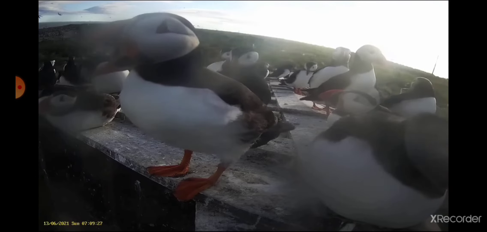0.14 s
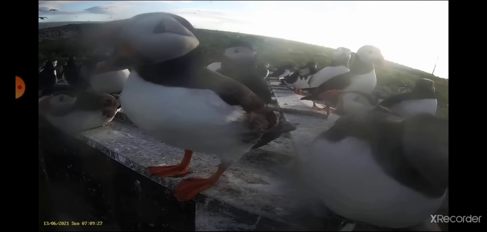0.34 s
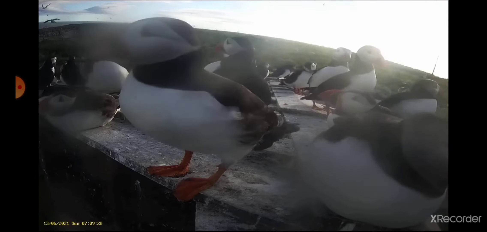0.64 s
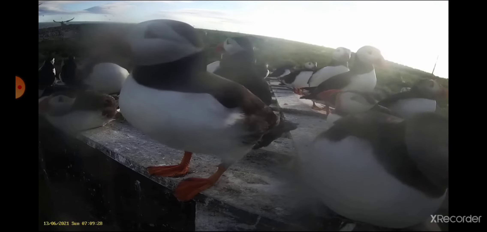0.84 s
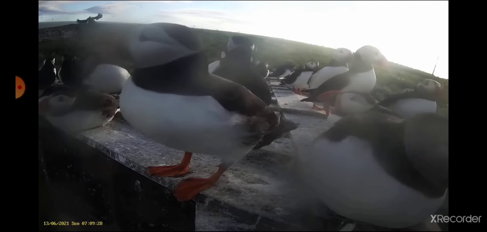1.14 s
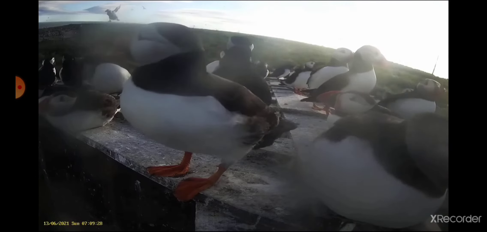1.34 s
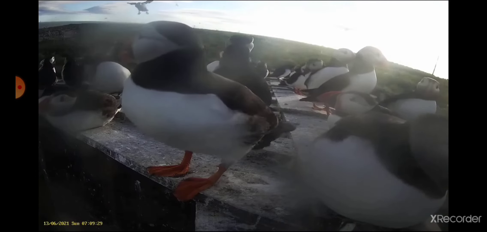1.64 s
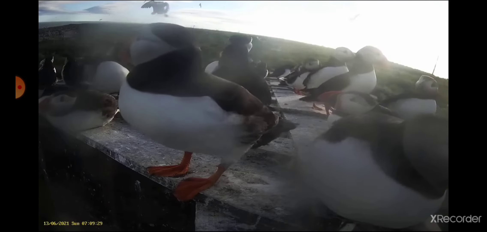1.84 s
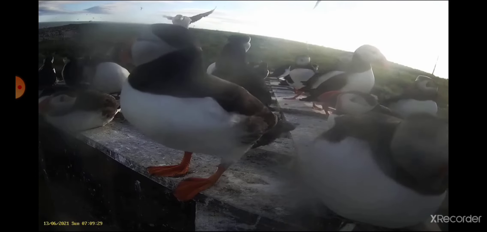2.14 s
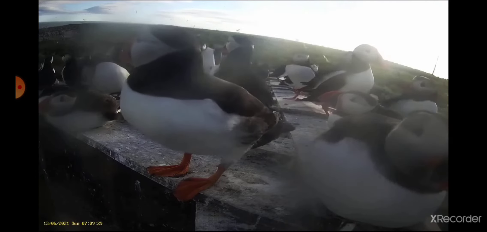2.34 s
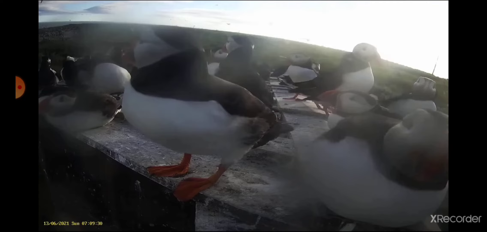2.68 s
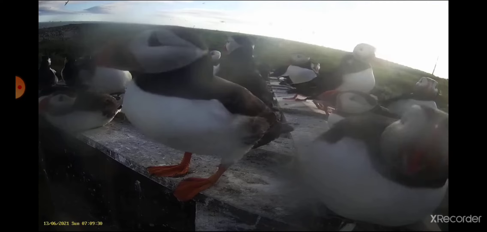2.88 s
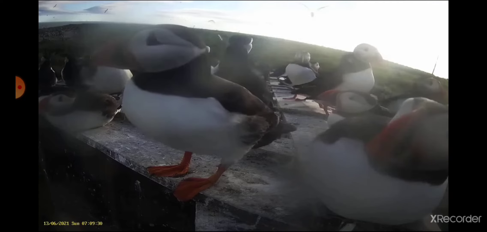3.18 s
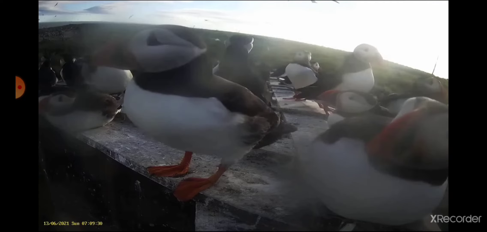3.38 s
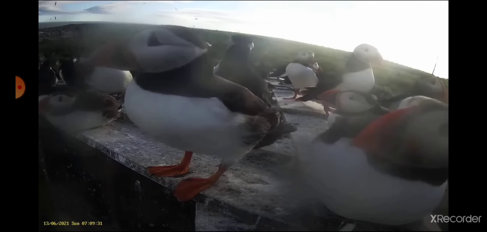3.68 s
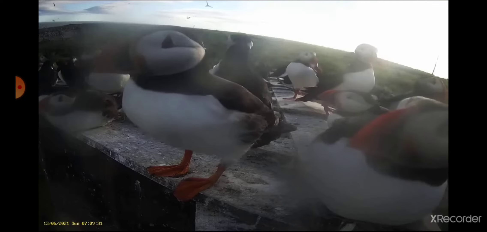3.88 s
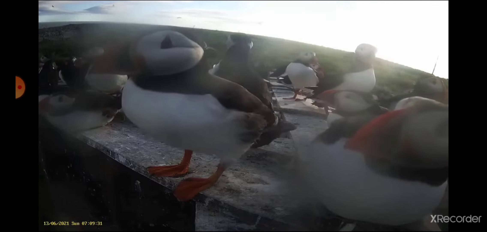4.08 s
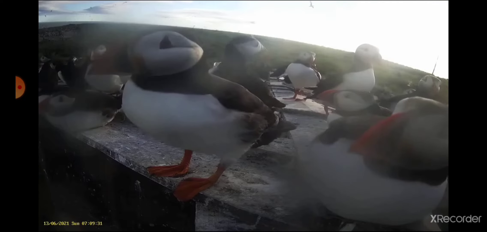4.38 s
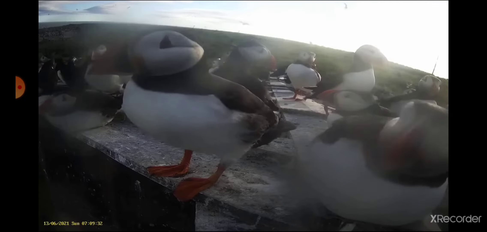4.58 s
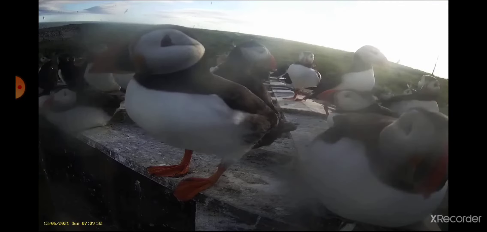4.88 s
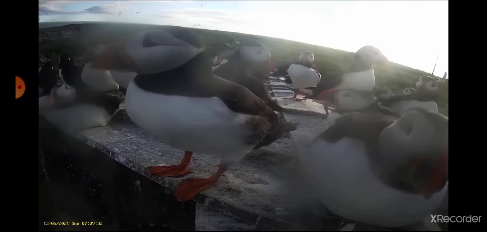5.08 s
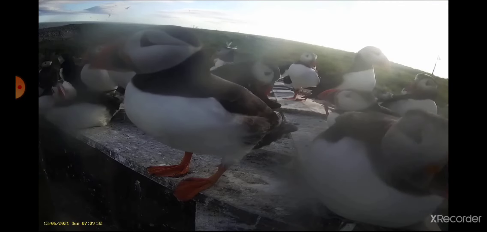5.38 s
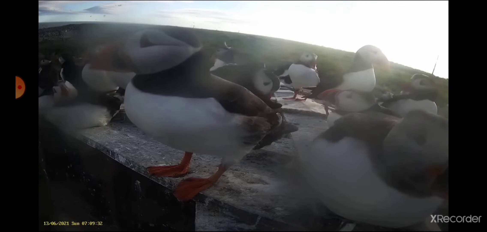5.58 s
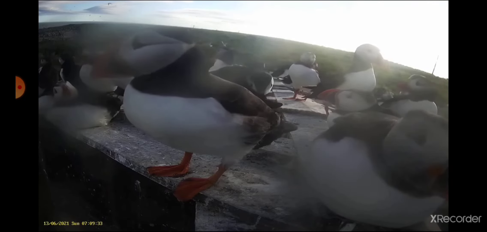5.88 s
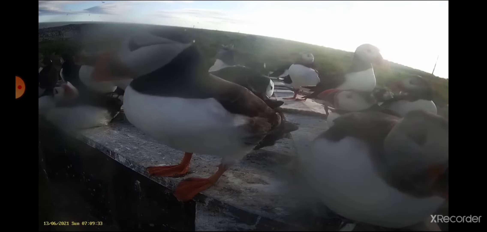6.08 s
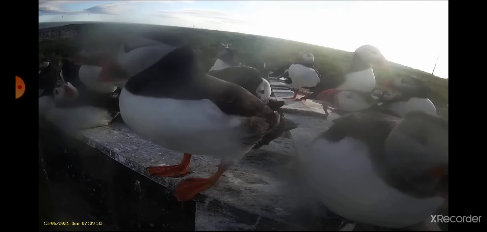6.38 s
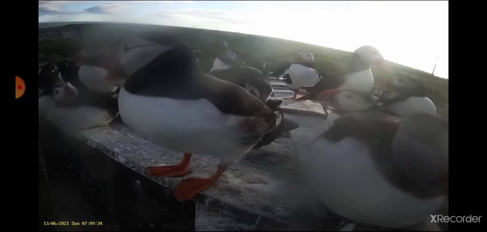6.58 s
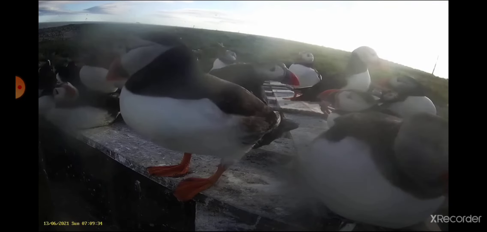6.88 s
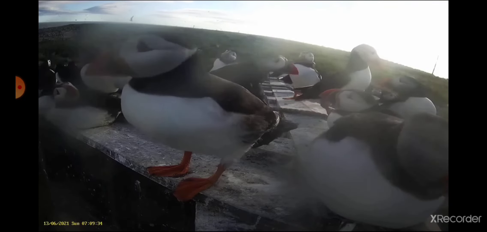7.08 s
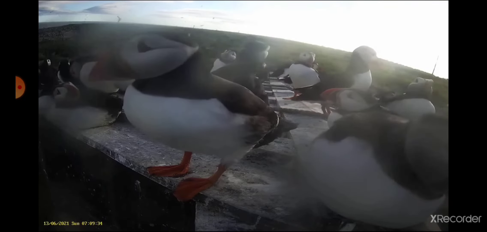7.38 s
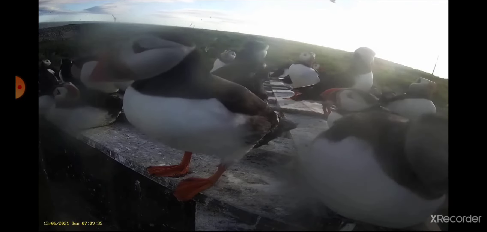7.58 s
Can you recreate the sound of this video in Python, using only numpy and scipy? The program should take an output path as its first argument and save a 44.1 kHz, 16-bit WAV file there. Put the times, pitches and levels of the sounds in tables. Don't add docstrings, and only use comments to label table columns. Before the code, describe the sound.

A dense seabird colony chatters shrilly while nearby birds rasp, shriek and stutter, loudest near the end, over wind rumble and webbed footsteps on rock.

```python
import sys
import numpy as np
from scipy import signal
from scipy.io import wavfile
from scipy.ndimage import uniform_filter1d

SR = 44100
rng = np.random.default_rng(int(sys.argv[2]) if len(sys.argv) > 2 else 0)


def level_to_linear(level):
    exponent = np.asarray(level, float) / 20
    return 10 ** exponent


def generate_wav(signal):
    frames = np.transpose(np.atleast_2d(signal))
    scaled = np.clip(frames, -1, 1) * 32767
    pcm = np.round(scaled).astype(np.int16)
    wavfile.write(sys.argv[1], SR, pcm)


N = 340893

# f/Hz, level/dB
BUZZ = [(500, -65), (600, -62), (700, -65.5), (800, -76)]
# f/Hz, density/dB per Hz
WIND_SPECTRUM = [(12, -36), (20, -7), (125, 3), (222, -1), (339, 3), (528, -7.5), (835, -15), (1000, -24),
                 (1300, -42), (2200, -120)]
# t at peak/s, peak level/dB
GUSTS = [(.2, -39), (.49, -50), (1.94, -58.5), (2.301, -52), (2.38, -50.5), (2.5, -54), (3.1, -43.5),
         (3.45, -46.5), (4.42, -50), (4.76, -48), (6.76, -50), (2.66, -52), (5.06, -41.5), (5.5, -50),
         (5.999, -47.5), (7.2, -46.5)]
# t/s, peak level/dB, ring f/Hz
STEPS = [
    (0.497, -32, 348),
    (1.949, -30.5, 315),
    (2.244, -22, 462),
    (2.271, -26.5, 333),
    (2.412, -28.5, 374),
    (2.475, -27, 945),
    (3.131, -22, 353),
    (6.511, -34.5, 1030),
    (7.431, -32.5, 402),
]
# t/s, crowd level/dB, shrillness/dB
COLONY = [(0.0, -39, -11), (0.3, -39, -12.5), (0.49, -37.5, -14.5), (0.6, -35, -10), (1.29, -38, -12.5),
          (2.58, -35, -11), (3.47, -38.5, -15.5), (3.55, -38, -5), (3.87, -36, -11), (4.41, -34, -16.5),
          (6.29, -38.5, -8), (6.31, -36.5, -0.5), (6.5, -34.5, -6), (7.02, -36.5, -9.5), (7.11, -34, -2),
          (7.3, -33.5, -17.5), (7.6, -35, -11.5), (7.73, -37, -6.5)]
# f/Hz, density/dB per Hz
CROWD_SPECTRUM = [(410, -37.5), (700, -11), (859, -12.5), (1870, 0.5), (2230, 1.5), (3050, 6.5),
                  (3360, 3.5), (4050, -8.5), (6160, -11), (7200, -26), (9360, -61.5), (15800, -120)]
# start t/s, end t/s, start f/Hz, end f/Hz, level/dB
WISPS = [(.605, .65, 5100, 4900, -42), (.66, .79, 4850, 4900, -45), (1.13, 1.2, 6190, 6700, -55.5),
         (1.751, 1.86, 5000, 5050, -51.5), (2.141, 2.23, 6500, 6250, -54), (2.502, 2.62, 4050, 3950, -52),
         (2.891, 3.05, 5250, 5710, -49.5), (3.455, 3.515, 5250, 5050, -53), (3.784, 3.92, 5900, 5750, -51),
         (4.058, 4.13, 5120, 5430, -54), (4.705, 4.8, 4800, 4550, -47), (4.779, 4.9, 6050, 5700, -54.5),
         (5.222, 5.36, 5400, 5600, -50), (5.42, 5.485, 5300, 5700, -48), (6.442, 6.52, 5000, 5060, -45),
         (7.076, 7.13, 4970, 5240, -44), (2.05, 2.11, 2300, 2500, -44), (3.543, 3.66, 1620, 1380, -48),
         (4.091, 4.45, 1700, 1780, -45), (5.63, 5.79, 3330, 3300, -40), (5.45, 5.53, 2350, 2650, -44),
         (6.548, 6.718, 5350, 5150, -44), (.6, .645, 3850, 3750, -41), (6.672, 6.71, 3950, 3900, -40),
         (.79, .84, 4600, 4700, -44), (.945, .968, 5500, 5800, -46), (.172, .2, 5150, 5000, -52),
         (5.118, 5.15, 5600, 5400, -50), (5.04, 5.11, 4850, 4900, -50), (4.46, 4.56, 5450, 5200, -49),
         (7.7, 7.72, 1700, 1720, -37), (2.47, 2.66, 1600, 1500, -45), (3.76, 3.81, 5750, 6050, -54)]
# t/s, peak level/dB, third harmonic f/Hz
KIPS = [
    (0.9339, -37.5, 5750),
    (1.2322, -36.5, 5860),
    (1.6598, -35, 5690),
    (2.0445, -30.5, 5750),
    (2.378, -41, 5500),
    (2.8527, -38.5, 5500),
    (3.3547, -31.5, 5460),
    (3.6769, -23, 5650),
]
# first t/s, length/s, f/Hz, rate/knocks per s, peak level/dB
RATTLES = [
    (7.133, .068, 2750, 94, -20),
    (7.085, .004, 3300, 94, -20),
    (7.238, .012, 2700, 100, -23),
]

# centre t/s, length/s, second harmonic f/Hz, peak level/dB
STUTTER = [(.363, .012, 3166, -28.5), (0.452, .016, 3100, -30.5), (5.848, .008, 3210, -28),
           (5.861, .014, 3200, -27.5), (5.879, .014, 3200, -19), (5.888, .008, 2956, -17.5),
           (5.896, .012, 2666, -22.5), (5.905, .01, 3050, -26), (5.945, .016, 3052, -17),
           (5.958, .014, 3040, -17), (5.966, .008, 2900, -22.5), (5.971, .014, 2620, -24),
           (5.989, .018, 3176, -27.5), (6.012, .024, 3145, -28), (6.028, .018, 3020, -29.5),
           (6.053, .02, 2187, -35), (6.304, .009, 2870, -26.5), (6.315, .012, 2960, -26),
           (6.386, .022, 2787, -26), (6.396, .009, 2700, -24.5), (6.55, .02, 2840, -29.5),
           (6.57, .014, 2750, -27), (6.586, .026, 2716, -29), (6.606, .01, 2740, -33.5),
           (6.617, .01, 2700, -28.5), (6.627, .01, 2700, -30.5), (6.64, .008, 2700, -33),
           (6.649, .01, 2720, -32.5), (6.658, .012, 2720, -33), (6.67, .01, 2730, -33),
           (6.683, .009, 2705, -30), (6.69, .01, 2660, -33.5), (6.703, .009, 2640, -29.5),
           (6.749, .018, 3180, -17), (6.76, .008, 2950, -21), (6.768, .011, 2720, -13),
           (6.778, .007, 2520, -20), (6.822, .027, 3020, -17), (6.844, .016, 2720, -16),
           (6.854, .01, 2550, -23), (7.327, .014, 2710, -32.5), (7.41, .01, 2690, -24),
           (7.434, .012, 2310, -30.5), (7.449, .012, 2325, -30), (7.482, .01, 2594, -28.5),
           (7.71, .005, 3490, -27.5), (7.714, .005, 3520, -25.5), (7.73, .008, 3576, -17.5)]
CHATTER = [(.611, .012, 2530, -30), (.62, .012, 2550, -30.5), (.641, .016, 2430, -29.5),
           (.661, .012, 2290, -32), (.697, .012, 2550, -33), (.714, .01, 2534, -28),
           (.737, .014, 2506, -29), (.753, .014, 2540, -31.5), (.774, .014, 2465, -29),
           (.79, .01, 2380, -29), (.809, 0.015, 2330, -28), (1.27, .02, 2040, -35.5),
           (1.281, .024, 3300, -38), (2.47, .02, 1946, -33), (2.47, .012, 2960, -33.5),
           (4.29, 0.017, 3330, -31), (4.315, .02, 3305, -31.5), (4.465, .016, 2940, -29.5),
           (4.482, .014, 2783, -31), (4.565, .02, 2610, -30.5), (4.749, .014, 2650, -27.5),
           (4.77, .022, 2656, -28.5), (4.792, .022, 2676, -27.5), (4.815, .016, 2890, -32),
           (4.857, .016, 2830, -31), (4.874, .014, 2700, -29.5), (4.893, .016, 2666, -31),
           (4.916, .014, 2676, -27.5), (4.936, .014, 2700, -29.5), (4.957, .014, 3090, -31.5),
           (5.168, .014, 2673, -30), (5.523, .014, 3000, -33), (5.66, .014, 2984, -33)]
TRILLS = [(3.53, .013, 3420, -41), (3.544, .013, 3510, -43), (3.561, .013, 3570, -42),
          (3.577, .013, 3680, -38), (3.591, .013, 3670, -39), (3.605, .013, 3590, -39),
          (3.618, .013, 3530, -43.5), (5.539, .011, 2760, -45), (5.551, .011, 2870, -38.5),
          (5.563, .011, 2940, -39), (5.574, .011, 2880, -39), (5.586, .011, 2770, -40)]
# rasp/0-1, third harmonic level/dB, fourth level/dB, pitch sag/per s
SYLLABLE_VOICES = [
    (.04, -22, -20, 2.5),
    (.35, -17, -17, 4.5),
    (.1, -0.5, -6.5, .6),
]

# t/s, length/s, second harmonic start f/Hz, end f/Hz, peak level/dB
NOTES = [(4.134, .012, 3750, 3650, -22), (5.908, .032, 3090, 3050, -29), (6.721, .013, 3150, 3140, -21),
         (7.096, .005, 3250, 3250, -19), (7.108, .006, 2980, 3000, -21), (7.117, .025, 3090, 3030, -21),
         (7.37, .01, 2960, 2950, -22), (7.386, .042, 3040, 2400, -24), (7.446, .053, 2910, 2450, -28)]
SHRIEKS = [(.24, .04, 3270, 3180, -32), (.278, .085, 3180, 3160, -32), (5.84, .034, 3190, 3200, -32),
           (6.422, .028, 2730, 2570, -32), (6.487, .024, 3870, 3860, -34), (6.516, .018, 3880, 3870, -30),
           (7.21, .034, 3270, 3240, -24)]
SCREAMS = [(.365, 0.077, 3130, 3070, -32.5), (.462, .04, 3100, 2696, -30), (0.955, 0.11, 2256, 2020, -39.5),
           (1.802, 0.073, 3270, 3070, -36.5), (2.141, 0.15, 3297, 2890, -40.5),
           (3.05, 0.17, 3223, 2444, -33.5), (4.41, 0.19, 3196, 2514, -31.5),
           (5.121, 0.058, 2610, 2414, -34.5)]
LEVEL_CALLS = [(.031, .06, 2110, 2015, -46), (.8, 0.052, 2264, 2416, -35.5), (1.33, .06, 2050, 2260, -45.5),
               (1.432, 0.098, 1630, 1826, -50), (1.476, 0.11, 3590, 3660, -42.5),
               (2.352, .055, 2004, 1980, -38), (2.484, .088, 3293, 3150, -34.5),
               (2.575, .12, 3146, 3060, -39), (2.74, 0.2, 2090, 2065, -45), (3.325, .035, 1916, 1957, -39),
               (3.385, .06, 1983, 2014, -41), (3.8, 0.11, 2926, 3066, -42), (4.02, 0.16, 3500, 3560, -40.5),
               (4.295, .055, 2060, 2200, -40.5), (4.245, .165, 3374, 3243, -37.5),
               (4.885, .05, 2005, 2130, -33), (5.685, .05, 2400, 2470, -37), (6.462, .048, 2407, 2385, -30.5),
               (7.101, 0.01, 2025, 2020, -31.5), (7.67, .045, 2990, 3440, -34)]
SCOLDS = [(.605, 0.057, 2600, 2170, -38), (.691, 0.15, 2490, 2323, -35), (1.4, .045, 2080, 1900, -35),
          (1.509, .129, 2946, 2640, -39), (1.889, 0.09, 1777, 2127, -39.5), (2.47, .129, 2730, 2594, -38.5),
          (2.86, .19, 3404, 3230, -38), (3.52, 0.11, 3200, 3610, -40.5), (5.161, 0.18, 2727, 2660, -38.5),
          (4.8, .17, 2900, 2800, -38), (6.6, .11, 2750, 2650, -40), (1.52, .12, 2350, 2200, -38),
          (1.25, .07, 2150, 2100, -41), (5.9, .045, 2450, 2300, -33), (5.2, 0.14, 2750, 2550, -38),
          (6.779, 0.035, 2290, 2323, -36), (7.195, .055, 2667, 2570, -31), (7.135, .06, 2650, 2600, -33),
          (.6, .26, 3500, 3300, -41), (.66, .04, 2900, 2800, -38), (6.857, 0.022, 2470, 2900, -41)]
ARCHES = [
    (6.31, .052, 2800, 3090, -20),
]
WHISTLES = [
    (3.375, .09, 3600, 3970, -43),
]
SLIDES = [(3.455, .07, 3500, 3380, -40), (5.04, .065, 3330, 3340, -39), (5.105, .04, 3340, 3050, -37),
          (2.05, .104, 3470, 2596, -34), (4.671, .039, 3185, 2460, -30), (1.091, .1, 2150, 2430, -37),
          (3.741, .059, 3390, 2920, -40)]

# third harmonic level/dB, fourth level/dB, peak/share of length, drop at start/dB, drop at end/dB
CRY_VOICES = [
    (-24, -28, 0.73, 1.5, 5),
    (-18, -15.5, 0.51, 1.5, 3.5),
    (-14, -20.5, 0.84, 2.5, 3.5),
    (-10.5, -21.5, 0.17, -2, -1),
    (-8.5, -21, 0.21, -1.5, 1.5),
    (-13, -21, 0.65, 12.5, 17),
    (-6, -6.5, .5, 12, 11.5),
    (-23, -20, 0.31, 3, 1.5),
]
CRY_RASPS = [.15, .12, .55, .4, .8, .1, .1, .15]
# longest glide/s, glide end/share of length, return/share of the way, catch in the voice/dB
CRY_TUNES = [(.022, .98, 0, 11), (.022, .98, 0, 6), (1, .75, 0, 0), (1, .95, 0, 0), (1, .95, 0, 0),
             (1, .5, 1, 0), (1, .5, 1, 0), (1, .98, 0, 0)]


def rms_one(x):
    return x / np.sqrt(np.mean(np.abs(x) ** 2) + 1e-20)


def drift(size, hz):
    r = np.exp(-2 * np.pi * hz / SR)
    chance = np.random.default_rng(rng.integers(2 ** 31))
    noise = chance.standard_normal(size + 600)
    return rms_one(signal.lfilter([1], [1, -2 * r, r * r], noise)[600:])


def in_time(rows):
    s, *columns = np.transpose(rows)
    return [np.interp(np.arange(N) / SR, s, c) for c in columns]


def add(out, start_s, sound):
    at = max(round(start_s * SR), 0)
    out[at:at + len(sound)] += sound[:N - at]


def bands(spectrum, patchy_db, lift_db=0, lift_hz=4300):
    hz, db = np.transpose(spectrum)
    edges = np.geomspace(hz[0], hz[-1], int(3 * np.log2(hz[-1] / hz[0])) + 2)
    for low, high in zip(edges, edges[1:]):
        level_db = np.interp(np.log(low * high) / 2, np.log(hz), db)
        level_db = level_db + patchy_db * drift(N, 8.6) + lift_db * (low > lift_hz)
        yield signal.butter(2, [low, high], "band", fs=SR, output="sos"), level_to_linear(level_db)


def voice(hz, rasp, overtones_db, blur_hz=350, first_db=-22, breath_db=-18):
    size, rasp = len(hz), np.clip(rasp, 0, 1)
    wobble = 1 + .018 * rasp * drift(size, 30)
    phase = np.pi * np.cumsum(hz * wobble) / SR
    first_db = first_db + 8 * (hz.mean() < 2400)
    rate, start = rng.random(2)
    beat_hz = (70 + 35 * rate) * (1 + .18 * drift(size, 25))
    beat = 2 * np.pi * (np.cumsum(beat_hz) / SR + start)
    pulses = rms_one((1.1 + np.sin(beat)) ** (1.8 * rasp ** 2.2))
    shake = .6 * rasp
    third_db, fourth_db = overtones_db
    levels_db = [first_db, 0, third_db, fourth_db, fourth_db - 13]
    out = level_to_linear(breath_db) * drift(size, 1100) * np.cos(2 * phase)
    for order, db in enumerate(levels_db, start=1):
        width_hz = (40 + blur_hz * rasp) * (order + 1) / 3
        smear = (drift(size, width_hz) + 1j * drift(size, width_hz)) / np.sqrt(2)
        line = (np.sqrt(1 - shake) + np.sqrt(shake) * smear) * np.exp(1j * order * phase)
        out = out + level_to_linear(db) * np.real(line)
    return np.sqrt(2) * out * pulses


def buzz():
    t = np.arange(N) / SR
    return sum(np.sqrt(2) * level_to_linear(db) * np.sin(2 * np.pi * hz * t) for hz, db in BUZZ)


def gusts(breeze_db=-49, rise_s=0.081, fall_s=0.096):
    t = np.arange(N) / SR
    strength = level_to_linear(breeze_db)
    for s, db in GUSTS:
        strength = strength + level_to_linear(db) * np.exp(np.minimum((t - s) / rise_s, (s - t) / fall_s))
    return strength


def wind():
    white = rng.standard_normal((2, N))
    out = 0
    for k, (sos, gain) in enumerate(bands(WIND_SPECTRUM, 1.8)):
        out = out + gain * signal.sosfilt(sos, white[k % 2])
    return rms_one(out)


def steps(t60=0.092, scuff_db=-1.5):
    out, t = np.zeros(N), np.arange(4000) / SR
    for s, db, hz in STEPS:
        ring = np.sin(2 * np.pi * hz * t)
        scuff = level_to_linear(scuff_db) * drift(len(t), 970)
        decay = level_to_linear(db - 3.0 - 60 * t / t60) * np.minimum(t / 0.006, 1)
        add(out, s, decay * (ring + scuff))
    return out


def crowd(shrill_db, count=600, hiss_db=0):
    far = np.zeros(N)
    for s, length, pitch, sag, rasp, size in rng.random((count, 6)):
        u = np.linspace(0, 1, int((.05 + .2 * length ** 2) * SR))
        hz = (1800 + 1900 * pitch) * (1 + .06 * np.sin(np.pi * u) - .2 * sag * u ** 2)
        swell = level_to_linear(3.0 * size) * np.sin(np.pi * u) ** 0.3
        add(far, s * N / SR, swell * voice(hz, .38 + .45 * rasp, (-3, -4), first_db=-9))
    far = far / np.sqrt(uniform_filter1d(far ** 2, size=6000) + 1e-9)
    far = far + level_to_linear(hiss_db) * rng.standard_normal(N)
    white, out = rng.standard_normal(N), 0
    for k, (sos, gain) in enumerate(bands(CROWD_SPECTRUM, 2.1, shrill_db - shrill_db.mean())):
        size = signal.sosfilt(sos, white).std() * (-1) ** k
        part = signal.sosfilt(sos, far)
        loudness = np.sqrt(uniform_filter1d(part ** 2, size=6500) + 1e-12)
        out = out + size * gain * part / loudness
    return rms_one(out)


def wisps(arch=.03, rasp=.5):
    out = np.zeros(N)
    for start, end, from_hz, to_hz, db in WISPS:
        u = np.linspace(0, 1, int((end - start) * SR))
        hz = (from_hz + (to_hz - from_hz) * u) * (1 + arch * np.sin(np.pi * u))
        swell = level_to_linear(db) * np.sin(np.pi * u) ** 0.054
        add(out, start, swell * voice(hz, rasp, (-40, -40), first_db=-36.5))
    return out


def kips(length_s=0.014, fall=0.11, snap_db=-12):
    out, u = np.zeros(N), np.linspace(0, 1, int(length_s * SR))
    shape = np.minimum(u / 0.025, 1) * (1 - u) ** 0.24
    for s, db, hz in KIPS:
        snap = level_to_linear(snap_db) * drift(len(u), 11000)
        tone = voice(hz / 1.5 * (1.05 - fall * u), 0.13, (1.5, -14))
        add(out, s, level_to_linear(db - 7.0) * shape * (snap + tone))
    return out


def rattles(loss_db=70, knock_s=.0009):
    out, t = np.zeros(N), np.linspace(-4, 4, int(8 * knock_s * SR))
    for s, length, hz, rate, db in RATTLES:
        for late in np.arange(0, length, 1 / rate):
            tone = voice(hz + 0 * t, .15, (-16, -17), first_db=-19, breath_db=-7)
            knock = np.exp(-t ** 2 / 2) * tone
            add(out, s + late - 4 * knock_s, level_to_linear(db - 3 - loss_db * late) * knock)
    return out


def syllables():
    out = np.zeros(N)
    for rows, throat in zip([STUTTER, CHATTER, TRILLS], SYLLABLE_VOICES):
        rasp, third_db, fourth_db, sag = throat
        for s, length, hz, db in rows:
            t = np.arange(-length / 2, length / 2, 1 / SR)
            swell = np.cos(np.pi * t / length) ** 0.97 * level_to_linear(-1.5 - 5 * rasp)
            tone = voice(hz * (1 - sag * t), rasp, (third_db, fourth_db))
            add(out, s - length / 2, level_to_linear(db) * swell * tone)
    return out


def ground(x, echoes=((.004, -12), (.017, -16), (.041, -24))):
    out = x.copy()
    for s, db in echoes:
        add(out, s, level_to_linear(db) * x)
    return out


def cries(fade_s=.0025, scoop=.04, scoop_s=.006, catch_s=.0025):
    out = np.zeros(N)
    kinds = [NOTES, SHRIEKS, SCREAMS, LEVEL_CALLS, SCOLDS, ARCHES, WHISTLES, SLIDES]
    for rows, rasp, throat, tune in zip(kinds, CRY_RASPS, CRY_VOICES, CRY_TUNES):
        third_db, fourth_db, peak, start_db, end_db = throat
        glide_s, settle, back, catch_db = tune
        for s, length, from_hz, to_hz, db in rows:
            hold = max(1 - glide_s / length, .05)
            t = np.arange(-fade_s, length + fade_s, 1 / SR)
            edge = np.clip(np.minimum(t - t[0], t[-1] - t) / (2 * fade_s), 0, 1)
            way = np.interp(t / length, [hold, settle, 1], [0, 1, 1 - back])
            if back:
                way = np.sin(way * np.pi / 2)
            pitch = uniform_filter1d(from_hz + (to_hz - from_hz) * way, size=400)
            pitch = pitch * (1 - scoop * np.exp(-(t + fade_s) / scoop_s))
            peak_at = np.clip(peak, .01, .99)
            level_db = db - np.interp(t / length, [0, peak_at, 1], [start_db, 0, end_db])
            drop = min((from_hz - to_hz) / 500, 1)
            level_db -= catch_db * drop * np.exp(-((t - hold * length) / catch_s) ** 2)
            add(out, s - fade_s, edge * level_to_linear(level_db) * voice(pitch, rasp, (third_db, fourth_db)))
    return out


def scene():
    crowd_db, shrill_db = in_time(COLONY)
    ambience = level_to_linear(crowd_db) * crowd(shrill_db) + gusts() * wind() + steps() + buzz()
    birds = ground(syllables() + cries() + rattles() + wisps())
    return (ambience + birds + kips())[None]


def top_cut(x):
    return signal.sosfilt(signal.butter(12, 7630, fs=SR, output="sos"), x)


def record(dry, cutoff_hz=7940):
    steep = signal.cheby2(14, 60, cutoff_hz, fs=SR, output="sos")
    mix = signal.sosfilt(steep, dry)
    return top_cut(mix)


dry = scene()
out = record(dry)
generate_wav(out)
```